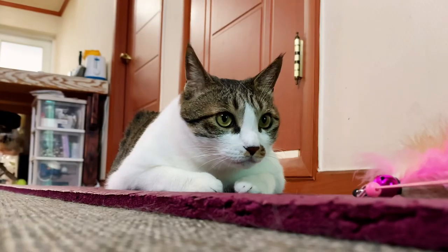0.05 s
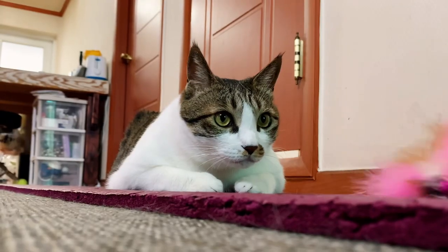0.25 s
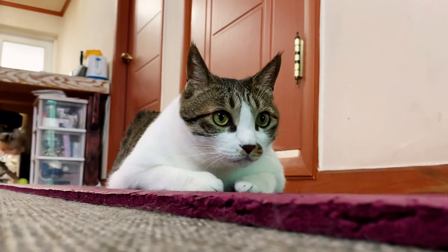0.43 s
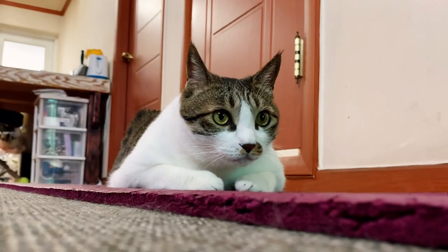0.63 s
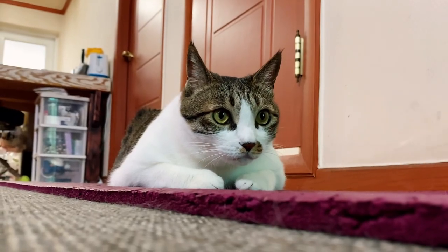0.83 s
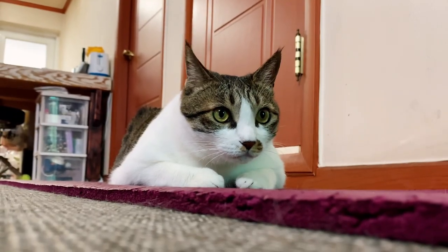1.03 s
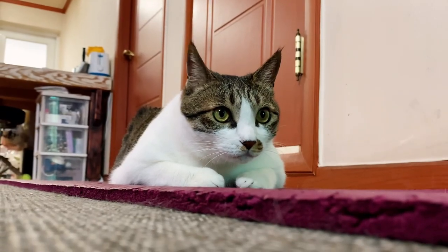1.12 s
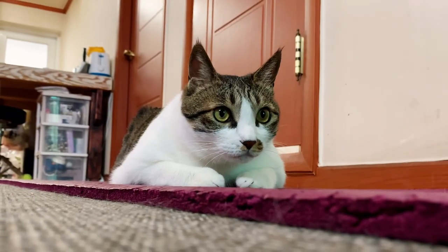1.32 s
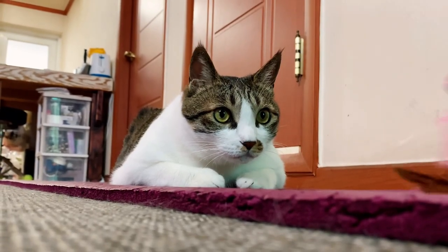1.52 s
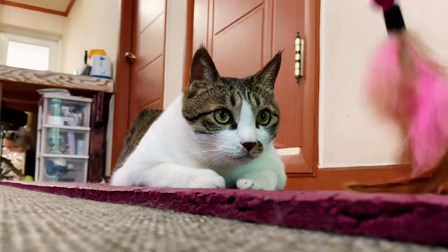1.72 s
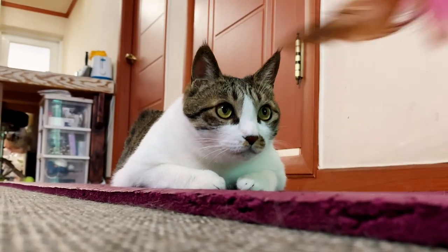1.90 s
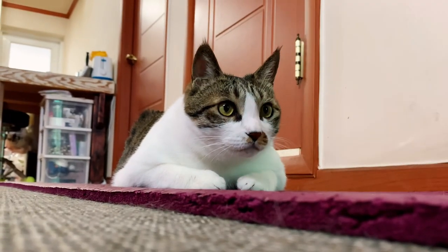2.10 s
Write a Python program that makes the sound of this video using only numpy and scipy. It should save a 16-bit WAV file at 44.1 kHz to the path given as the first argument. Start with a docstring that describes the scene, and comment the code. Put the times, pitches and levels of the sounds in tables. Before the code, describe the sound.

A tiny bell jingles in two bursts as a feather cat toy is dragged and swung.

```python
"""Feathers rustle and a tiny bell jingles as a cat toy is dragged off a mat. The toy knocks on the
floor, then jingles more lightly as it is swung in the air. A loose pellet strikes the bell's shell,
which rings at two high pitches, and rattles around between strikes. The clasp taps and rubs on the
bell. Behind it all is a small room with the low hum of a household motor."""
import sys
import numpy as np
from scipy import signal
from scipy.fft import rfft, irfft
from scipy.io import wavfile
from scipy.ndimage import uniform_filter1d

SR = 44100
rng = np.random.default_rng(int(sys.argv[2]) if len(sys.argv) > 2 else 0)


def to_wav(sig):
    """Store sig (one row per channel, or 1-D mono) as 16-bit WAV at the path in sys.argv[1].

    Samples outside -1..1 are clipped; the rate is SR.
    """
    pcm = np.clip(np.atleast_2d(sig), -1, 1) * 32767
    pcm = np.round(pcm).astype(np.int16)
    wavfile.write(sys.argv[1], SR, pcm.T)  # frames by channels


N = 94815

RISE_S = 0.00036  # how quickly the shell starts to ring
# The shell's two tones. Each row: pitch in Hz, ring time as a multiple of the strike's,
# head start of the left ear in radians, relative level in the rattle in dB.
SHELL_TONES = [(8685, 0.92, -1.2, 23), (9727, 1.14, -0.43, -24.5)]
# The pellet hits the shell. Each row: start in seconds, low tone in dB, high tone in dB,
# click in dB, ring time in seconds (the time to fade by 60 dB).
STRIKES = [(0.191, -34, -48, -39, 0.034), (0.2183, -27, -52, -37.5, 0.26), (0.223, -18, -36, -49, 0.14),
           (0.247, -19, -32.5, -32, 0.055), (0.271, -40, -43.5, -67, 0.12),
           (0.3129, -39.5, -53, -39.5, 0.11), (0.3316, -28, -43, -39, 0.13), (0.3429, -23, -33, -28.5, .04),
           (0.3489, -18.5, -32, -31.5, .035), (0.3574, -46, -28.5, -47, 0.079),
           (0.3839, -20, -38, -27, 0.072), (0.3948, -21, -37, -24.5, 0.049),
           (0.3987, -21.5, -23, -23.5, .03), (0.405, -22.5, -25, -31, 0.052),
           (0.413, -31, -26.5, -33, 0.033), (0.4163, -22, -31, -31, .06), (0.4314, -33, -35, -52, 0.19),
           (0.4549, -39.5, -40.5, -43.5, 0.12), (0.5102, -18, -29.5, -31.5, 0.016),
           (0.517, -27, -49, -37.5, 0.14), (0.5566, -38.5, -66, -37, 0.079),
           (0.5862, -29.5, -36.5, -43.5, 0.14), (0.6249, -43.5, -58, -55, 0.52),
           (0.6845, -37.5, -93, -49, 0.16), (0.755, -55, -83.5, -57.5, 0.29),
           (.8900, -64.5, -85.5, -69.5, 0.13), (1.003, -58, -85, -70, 0.22), (1.1759, -59, -87, -66, .08),
           (1.2209, -48.5, -81, -54, 0.11), (1.2434, -54.5, -53, -74, 0.75), (1.2823, -35, -60, -41, 0.041),
           (1.2901, -25.5, -33, -64, 0.0055), (1.3034, -39.5, -57, -57, 0.11),
           (1.3469, -45.5, -84, -58, 0.11), (1.3662, -41, -92, -49, 0.059),
           (1.4181, -28.5, -79, -42.5, 0.018), (1.4362, -49, -59, -47, 0.037),
           (1.4777, -42.5, -52, -45.5, 0.062), (1.5190, -46, -83, -60, 0.049),
           (1.586, -42, -56, -54, 0.032), (1.5922, -37.5, -74, -42.5, 0.012),
           (1.5987, -40.5, -51, -44, 0.049), (1.6966, -28, -42.5, -38.5, 0.033),
           (1.7045, -27.5, -48, -39.5, 0.032), (1.7378, -37, -53, -46.5, 0.03),
           (1.7420, -33.5, -66, -52, 0.032), (1.7587, -40, -70, -55, 0.015),
           (1.7882, -38, -66, -67, 0.0066), (1.8008, -29.5, -54, -52.5, 0.014),
           (1.8315, -37, -64, -79, 0.018), (1.848, -41, -45.5, -52, 0.056), (1.9143, -32, -41, -47, 0.035)]


def bell():
    """Each strike rings both tones until the next one stops them; shorter rings stray more in pitch."""
    twin_gap_hz, twin_db = 90, -13  # the bell's slit adds a twin just below each tone, so the two beat
    stop_s = 0.002
    out = np.zeros((2, N))
    strays = rng.standard_normal((len(STRIKES), 2))
    ends = [row[0] for row in STRIKES[1:]] + [N / SR]
    for (start, low_db, high_db, _, ring_s), end, stray_pair in zip(STRIKES, ends, strays):
        i = int(start * SR)
        age = np.arange(min(N - i, SR // 4)) / SR
        rise = 1 - np.exp(-age / RISE_S)
        stop = np.exp(-np.maximum(age - (end - start), 0) / stop_s)
        for (hz, stretch, lead, _), db, stray in zip(SHELL_TONES, (low_db, high_db), stray_pair):
            pitch_hz = hz + 0.28 * stray / ring_s
            phase = 2 * np.pi * pitch_hz * age + np.array([[lead], [0]])
            twin = amp(twin_db) * np.sin(phase + 2 * np.pi * (rng.random() - twin_gap_hz * age))
            level = amp(db) * rise * stop * fade(age, ring_s * stretch)
            out[:, i:i + len(age)] += level * (np.sin(phase) + twin)
    return out


# The tone of the pellet's click and of its clack. Each row: frequency in Hz, relative level in dB.
CLICK_COLOUR = [(1500, -21), (3700, -14), (4900, -1), (6000, -10), (8500, 1), (10500, -12.5), (15000, -32)]
CLACK_COLOUR = [(1500, -39.5), (3800, -21), (4600, -4), (5100, 0), (5800, -11), (8000, -7), (11000, -32)]


def pellet_clicks():
    """Each strike also makes a sharp click of contact and a longer, hollow clack."""
    hits = [(start, db) for start, _, _, db, _ in STRIKES]
    click = bursts([(start, db, 0.00043) for start, db in hits]) * stereo_noise(likeness=0.22)
    clack = bursts([(start, db - 12.5, 0.0053) for start, db in hits]) * stereo_noise(likeness=0.11)
    return colour(click, CLICK_COLOUR) + pan(colour(clack, CLACK_COLOUR), left_db=4)


# The pellet rolls around in the shell. Each row: time in seconds, level in dB.
RATTLE_LEVELS = [(.1, -106), (.18, -58), (.24, -46), (.3, -56), (.33, -59.5), (.41, -35.5), (.45, -45.5),
                 (.52, -56.5), (.66, -53.5), (.75, -78), (1.2, -85.5), (1.225, -64.5), (1.305, -48),
                 (1.405, -63.5), (1.44, -59.5), (1.49, -58.5), (1.56, -88), (1.6, -57.5), (1.68, -81),
                 (1.71, -53), (1.77, -76.5), (1.86, -62.5), (1.89, -84), (1.93, -64.5), (2.03, -96)]


def rattle():
    """Light touches of the rolling pellet keep the shell ringing; each one gives a small clack."""
    touches = contacts(per_second=1000, spread_db=6) * level_curve(RATTLE_LEVELS)
    age = np.arange(SR // 10) / SR
    tones = sum(amp(db) * np.sin(2 * np.pi * hz * age + np.array([[lead], [0]]))
                for hz, _, lead, db in SHELL_TONES)
    rise = 1 - np.exp(-age / RISE_S)
    ring = ring_through(touches[None], tones * rise * fade(age, ring_s=0.023))
    carry = np.exp(-2 / (0.0012 * SR))  # each clack dies away over about 1.2 ms
    clack_power = signal.lfilter([1 - carry], [1, -carry], touches ** 2 + 1e-18)
    clack = np.sqrt(clack_power) * rng.standard_normal((2, N))
    return ring + amp(-10.5) * pan(colour(clack, CLACK_COLOUR), left_db=4)


# The tone of a clasp tap. Each row: frequency in Hz, relative level in dB.
TAP_COLOUR = [(1500, -12.5), (4200, 3.5), (6500, 0.5), (9500, -7.5), (14000, -29)]
# The clasp's taps. Each row: start in seconds, level in dB.
CLASP_TAPS = [(.191, -40.5), (0.2159, -38.5), (.3025, -52), (0.396, -36.5), (0.5103, -41), (.6258, -52),
              (1.2197, -57.5), (1.5845, -42.5), (1.6968, -40.5), (1.7068, -50.5)]


def clasp_taps():
    """The clasp makes dry taps, too short to ring."""
    taps = bursts([(start, db, 0.0011) for start, db in CLASP_TAPS]) * stereo_noise(likeness=0.17)
    return from_right(colour(taps, TAP_COLOUR))


# The bell rubs on the clasp. Each row: time in seconds, level in dB.
RUB_LEVELS = [(.13, -93), (.222, -39), (.28, -68), (.35, -43), (.375, -63), (.41, -38.5), (.46, -56.5),
              (.58, -100)]
# The hardest metal-on-metal hits. Each row: start in seconds, level in dB.
SNAPS = [(.2248, -29.5), (.3494, -25), (.3568, -20), (.4334, -38.5), (1.4895, -50.5)]


def metal_rubbing():
    """Bell and clasp rub with a fine sizzle; the hardest contacts add a bright snap."""
    sizzle = contacts(per_second=2500, spread_db=10) * level_curve(RUB_LEVELS)
    snaps = bursts([(start, db, 0.00043) for start, db in SNAPS]) * stereo_noise(likeness=0.3)
    bright_band = signal.butter(2, (9150, 13750), "band", fs=SR, output="sos")
    return signal.sosfilt(bright_band, sizzle + snaps)


# The tone of the rustle. Each row: frequency in Hz, relative level in dB.
FEATHER_COLOUR = [(100, 15.5), (850, 15.5), (1250, -0.5), (2300, 2.5), (5000, 2.5), (7000, -9),
                  (11000, 0.5), (15500, -23.5)]
# Feathers and cord drag over the mat. Each row: time in seconds, level in dB.
DRAG_LEVELS = [(0, -81), (.1, -77), (.19, -49), (.25, -56.5), (.28, -55.5), (.32, -60.5), (.38, -68.5),
               (.41, -46), (.445, -54.5), (.5, -61), (.52, -53), (.6, -71), (.65, -48.5), (.67, -69.5),
               (.92, -86)]


def feathers():
    """Feathers brush the mat in many tiny contacts that blur into a rustle."""
    left, right, shared = (contacts(per_second=1500, spread_db=8) for _ in range(3))
    crackle = unit(np.array([left, right]) + shared)
    return from_right(colour(crackle * level_curve(DRAG_LEVELS), FEATHER_COLOUR))


# The tone of a scuff on the floorboard. Each row: frequency in Hz, relative level in dB.
SCUFF_COLOUR = [(170, -12), (300, -0.5), (880, -5.5), (1200, -16.5), (4000, -48)]
# The tones of a thump. Each row: pitch in Hz, relative level in dB, ring time in seconds.
THUMP_TONES = [(310, -2, 0.1), (480, 0, .03), (573.5, 0, .035), (855, -3.5, .045)]
# The toy hits the floor. Each row: start in seconds, level in dB, scuff decay in seconds,
# hardness in dB per octave (a harder knock favours the higher tones).
KNOCKS = [(0.4107, -40, 0.0049, 0.5), (0.508, -45.5, 0.0072, 11), (0.646, -55, 0.058, 9),
          (0.807, -59, 0.078, -1.5)]


def floor_knocks():
    """The toy bumps the floor with a noisy scuff and a short thump."""
    scuff = colour(bursts([row[:3] for row in KNOCKS]) * stereo_noise(likeness=1), SCUFF_COLOUR)
    thump = np.zeros(N)
    for start, db, _, hardness in KNOCKS:
        age = np.maximum(np.arange(N) / SR - start, 0)
        for hz, tone_db, ring_s in THUMP_TONES:
            level = amp(db + tone_db + hardness * np.log2(hz / 480))
            thump += level * np.sin(2 * np.pi * hz * age) * fade(age, ring_s)
    thump = signal.sosfilt(signal.butter(2, 240, "high", fs=SR, output="sos"), thump)
    return from_right(pan(scuff + thump, left_db=-3))


def room_echo(sound):
    """The nearby walls send back a short, blurred echo."""
    age = np.arange(SR // 2) / SR
    tail = stereo_noise(likeness=1)[:, :len(age)] * fade(age, ring_s=0.33) * (age > 0.0013)
    return sound + amp(-19.5) * ring_through(sound, tail)


# The motor's tones. Each row: pitch in Hz, level in dB.
HUM_TONES = [(56.6, -55), (121.5, -70.5), (295.5, -64), (566, -73)]


def motor_hum():
    """A household motor hums, wavering slightly in loudness and pitch."""
    t = np.arange(N) / SR
    hum = np.zeros(N)
    for hz, db in HUM_TONES:
        level = amp(db) * np.sqrt(2) * (1 + 0.053 * wander(per_second=8.3))
        hum += level * np.sin(2 * np.pi * hz * t + 0.99 * wander(per_second=7.7))
    return from_right(np.array([hum, hum]))


# The tone of the room's noise. Each row: frequency in Hz, relative level in dB.
AIR_COLOUR = [(25, -34), (50, 0), (90, -2), (170, -11.5), (330, -8), (750, -24.5), (1400, -36.5),
              (3500, -51), (14000, -47), (16000, -61.5)]
# How wide that noise is. Each row: frequency in Hz, level in dB of the part that is opposite
# in the two ears, compared with the part they share.
AIR_WIDTH = [(50, -19.5), (300, -13.5), (700, -1), (16000, -9.5)]


def room_noise():
    """A soft, low rush of noise fills the room."""
    hz = np.arange(N // 2 + 1) * SR / N
    width = amp(np.interp(hz, *np.array(AIR_WIDTH).T))
    opposite = irfft(rfft(rng.standard_normal(N)) * width, N) * np.array([[1], [-1]])
    return amp(-58) * colour(rng.standard_normal(N) + opposite, AIR_COLOUR)


def amp(db):
    """Turn decibels into a volume multiplier."""
    return 10 ** (np.asarray(db) / 20)


def unit(x):
    """Scale a signal to an average power of 1."""
    return x / np.sqrt(np.mean(x ** 2))


def fade(age, ring_s):
    """A fade that falls by 60 dB in ring_s seconds."""
    return np.exp(-np.log(1000) * age / ring_s)


def level_curve(points):
    """Volume over time, joining up (seconds, dB) points."""
    return amp(np.interp(np.arange(N) / SR, *np.array(points).T))


def colour(sound, points):
    """Shape bass and treble through (Hz, dB) points; white noise keeps its overall power."""
    size = 4096
    hz, db = np.array(points).T
    log_hz = np.log(np.arange(size // 2 + 1) * SR / size + 1)
    gain = unit(amp(np.interp(log_hz, np.log(hz), db)))
    cepstrum = irfft(np.log(gain))
    cepstrum[1:size // 2] *= 2  # fold it forward in time, so nothing sounds before a hit
    cepstrum[size // 2 + 1:] = 0
    response = irfft(np.exp(rfft(cepstrum)))
    return signal.fftconvolve(np.atleast_2d(sound), response[None], axes=1)[:, :N]


def ring_through(sound, response):
    """Let every sample set off a stereo ring or echo, scaled to an energy of 1 per ear."""
    return signal.fftconvolve(sound, response / np.sqrt(np.sum(response ** 2) / 2), axes=1)[:, :N]


def wander(per_second):
    """A slow random drift with a typical size of 1."""
    hold = int(SR / per_second)
    steps = np.repeat(rng.standard_normal(N // hold + 1), hold)
    return unit(uniform_filter1d(uniform_filter1d(steps, hold), hold)[:N])


def contacts(per_second, spread_db):
    """Tiny ticks at random moments and of uneven size."""
    ticks = (rng.random(N) < per_second / SR) * rng.choice([-1, 1], N)
    return unit(ticks * amp(spread_db * np.clip(rng.standard_normal(N), -2, 2)))


def bursts(rows):
    """Volume that jumps up and dies away. Each row: start in seconds, level in dB, decay in seconds."""
    power = np.zeros(N)
    for start, db, decay_s in rows:
        i = int(start * SR)
        age = np.arange(min(N - i, SR // 4)) / SR
        power[i:i + len(age)] += (amp(db) * np.exp(-age / decay_s)) ** 2
    return np.sqrt(power)


def stereo_noise(likeness):
    """Noise for both ears, from unrelated (likeness 0) to identical (likeness 1)."""
    shared = np.sqrt(likeness) * rng.standard_normal(N)
    return shared + np.sqrt(1 - likeness) * rng.standard_normal((2, N))


def pan(sound, left_db):
    """Make the left side left_db louder than the right; a negative value favours the right."""
    return sound * amp(np.array([[left_db], [-left_db]]) / 2)


def from_right(sound):
    """Below the treble, sound from the right reaches the left ear a little late."""
    hz = np.arange(N // 2 + 1) * SR / N
    lag_s = 0.0004 * np.clip(2 - hz / 3500, 0, 1)
    left = irfft(rfft(sound[0]) * np.exp(-2j * np.pi * hz * lag_s), N)
    return np.array([left, sound[1]])


def scene():
    """The toy and its echo, over the room's hum and noise."""
    toy = bell() + pellet_clicks() + clasp_taps() + metal_rubbing() + rattle()
    toy += feathers() + floor_knocks()
    return room_echo(toy) + motor_hum() + room_noise()


def record(dry):
    """Cut the treble above 16000 Hz."""
    return signal.sosfilt(signal.ellip(8, .2, 70, 16000, fs=SR, output="sos"), dry)


dry = scene()
out = record(dry)
to_wav(out)
```